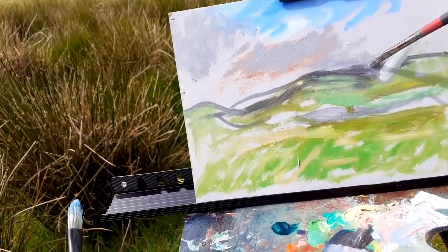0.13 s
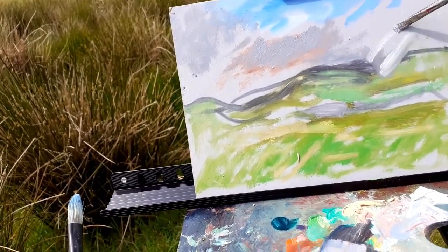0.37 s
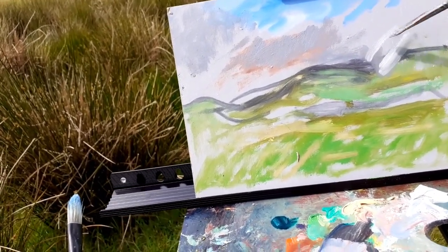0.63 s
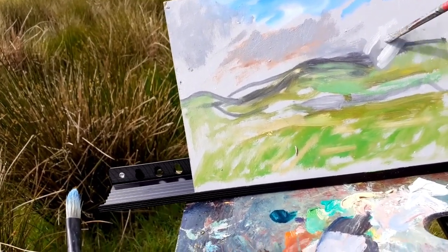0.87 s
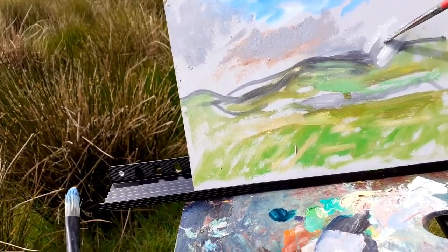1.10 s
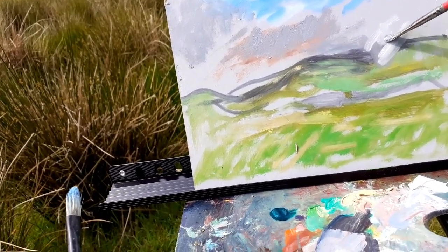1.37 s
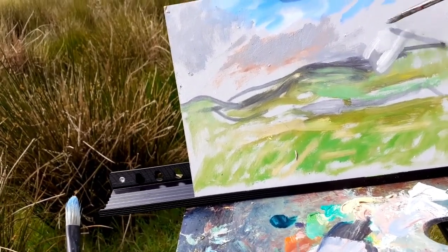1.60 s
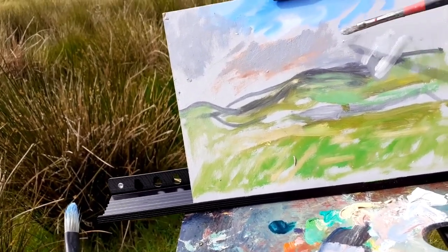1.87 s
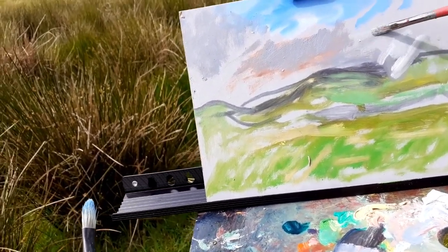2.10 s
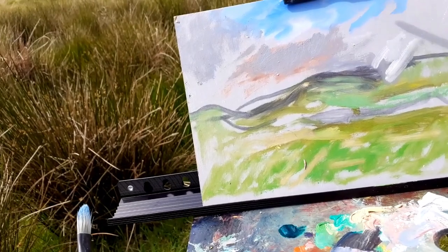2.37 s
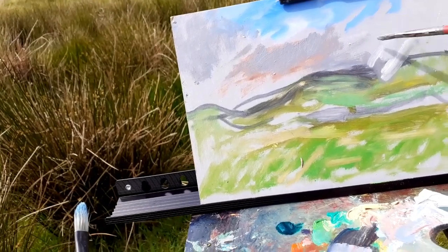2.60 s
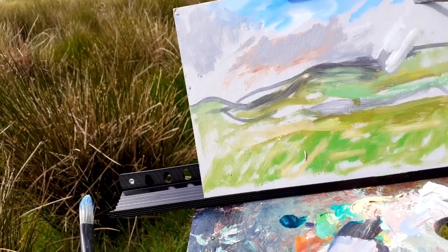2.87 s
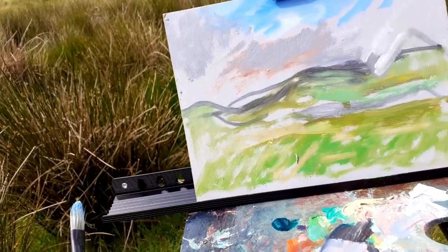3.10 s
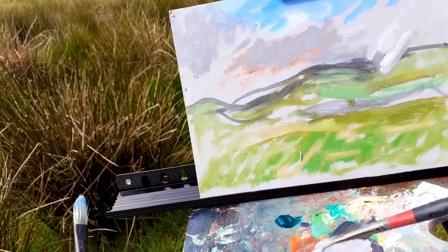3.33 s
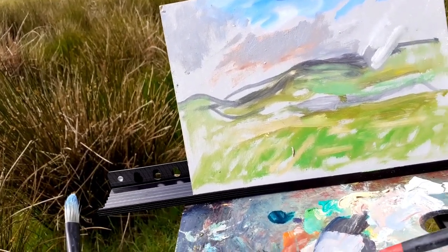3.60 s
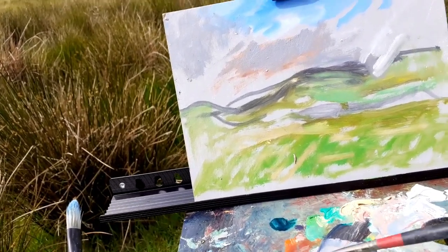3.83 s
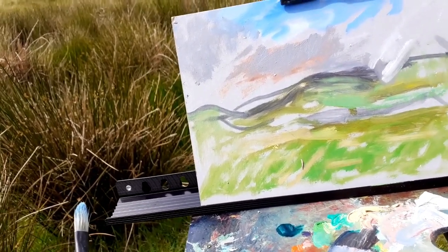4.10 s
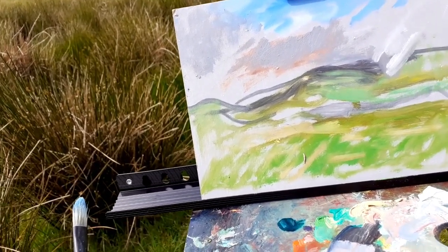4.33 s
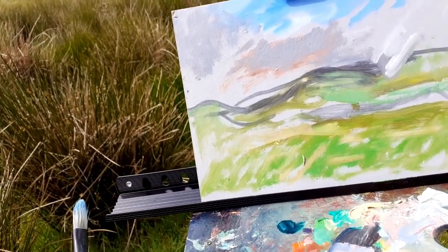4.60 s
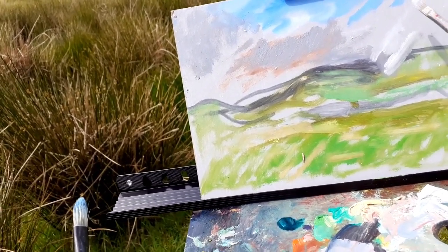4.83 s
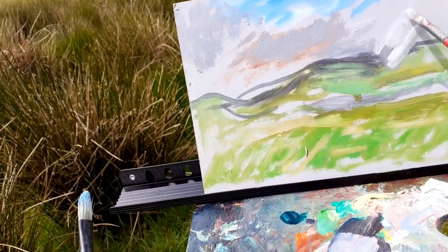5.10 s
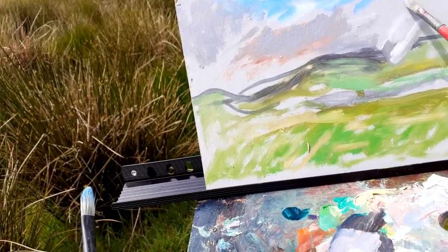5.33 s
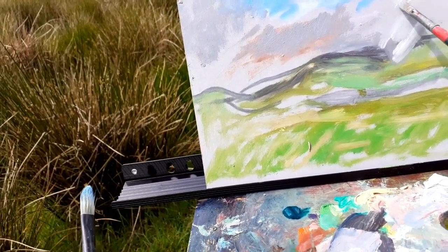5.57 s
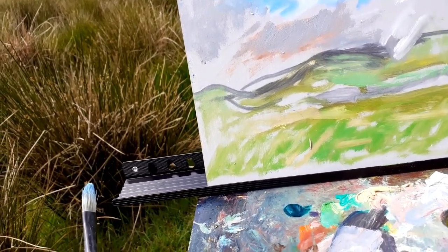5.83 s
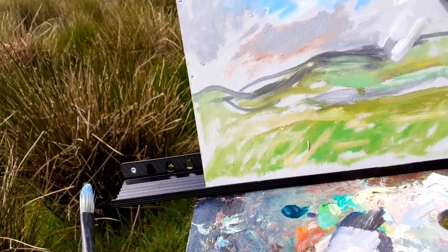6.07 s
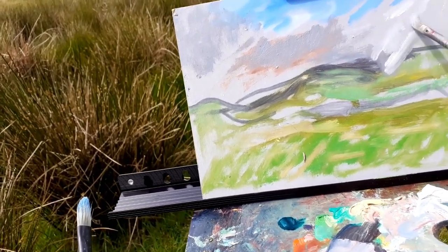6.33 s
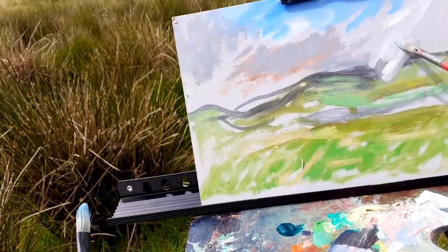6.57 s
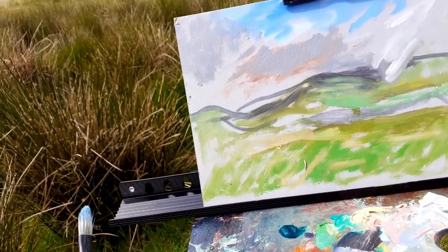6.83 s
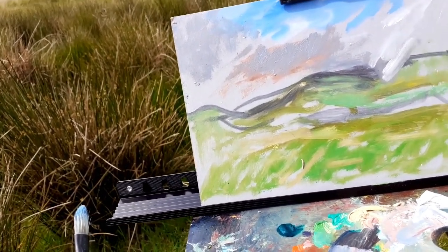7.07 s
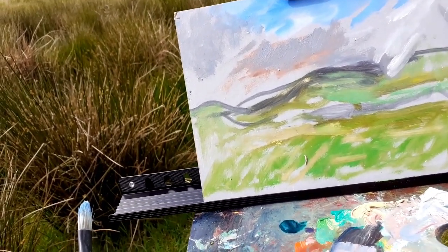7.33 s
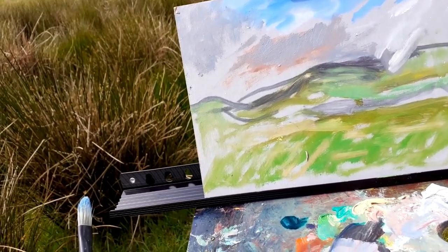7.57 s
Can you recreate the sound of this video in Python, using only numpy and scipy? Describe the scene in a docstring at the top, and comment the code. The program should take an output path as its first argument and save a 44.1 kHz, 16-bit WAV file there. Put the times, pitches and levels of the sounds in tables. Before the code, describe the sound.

Strong low wind thumps fade to near quiet while bristles scrape a panel in brief bursts, ending in a brisk run of louder strokes.

```python
"""Brush scrubbing a panel outdoors

A stiff paintbrush scrubs a primed panel in short strokes, close to two microphones on open moorland:
dense bristle clicks hiss, scrape and ring the panel's modes; the ferrule knocks as short blows.
Wind noise, unlike on the two sides, buffets hard at first and dies down, stirring on the right at the end.
Shaped noise makes grass and sleeve rustle, resonated noise a fading far engine, gliding sines a bird."""
import sys
import numpy as np
from scipy import signal
from scipy.fft import rfft, irfft, next_fast_len
from scipy.io import wavfile
from scipy.ndimage import uniform_filter1d

SR = 44100
rng = np.random.default_rng(int(sys.argv[2]) if len(sys.argv) > 2 else 0)


def invert_db(level):
    """Linear amplitude ratio for a level in decibels (20 dB per decade), elementwise."""
    return 10 ** (np.asarray(level, dtype=float) / 20)


def wrap_up_sound(samples):
    """Save the sound to the file named by the first command line argument, as 16-bit audio."""
    columns = np.atleast_2d(samples).T
    # keep every value between -1 and 1, then stretch to whole-number steps
    tamed = np.clip(columns, -1, 1)
    steps = np.round(tamed * 32767).astype(np.int16)
    wavfile.write(sys.argv[1], SR, steps)


N = 339129

# panel modes: (frequency [Hz], width [Hz], level brushed mid panel [dB], level in the far corner [dB])
PANEL = [(149, 14, -4, -6), (254, 88, -3, 2.5), (353, 33, 7.5, 1.5), (480, 170, 0.5, -11.5),
         (734, 21, -5, -4)]


def evened(x):
    """Scales each channel to rms 1."""
    return x / np.sqrt(np.mean(x ** 2, -1, keepdims=True) + 1e-20)


def spectrum_db(points, hz):
    """Interpolates (frequency [Hz], level [dB]) over log frequency; -90 dB outside."""
    f, db = np.transpose(points)
    return np.interp(np.log(hz + 1), np.log(f + 1), db, left=-90, right=-90)


def add(mix, start_s, sound):
    """Adds a sound into the mix in place, cut at the end."""
    part = mix[max(round(start_s * SR), 0):][:len(sound)]
    part += sound[:len(part)]


def coloured(x, points):
    """Shapes x by a spectrum, to rms 1."""
    size = next_fast_len(N)
    gain = invert_db(spectrum_db(points, np.fft.rfftfreq(size, 1 / SR)))
    return evened(irfft(rfft(x, size) * gain, size)[..., :N])


def resonate(x, hz, width_hz):
    """Two-pole resonance with zeros at 0 Hz and half the sample rate."""
    r = np.exp(-np.pi * width_hz / SR)
    return signal.lfilter([1 - r, 0, r - 1], [1, -2 * r * np.cos(2 * np.pi * hz / SR), r * r], x)


def wander(seconds, channels=2):
    """Smoothed noise of rms 1 that holds for about the given time."""
    size = max(round(seconds * SR), 1)
    noise = rng.standard_normal((channels, N))
    return evened(uniform_filter1d(uniform_filter1d(noise, size), size))


def patchy(x, depth_db):
    """Colour that drifts in patches some hundred Hz wide and some 90 ms long, alike on both sides."""
    z = signal.stft(x, nperseg=512)[2]
    field = rng.standard_normal(z.shape[1:])
    field = uniform_filter1d(uniform_filter1d(field, size=4, axis=0), size=16, axis=1)
    z = z * invert_db(depth_db * field / field.std())
    return evened(signal.istft(z, nperseg=512)[1][:, :N])


def heard(source, other, lag_s, alike, right_db):
    """A source reaches the left microphone later; reflections add an unlike part there."""
    alike = np.clip(alike, 0, 1)
    left = alike * np.roll(source, round(lag_s * SR)) + np.sqrt(1 - alike ** 2) * other
    return np.array([left, source]) * invert_db([[-right_db], [right_db]])


def shaded(pair, column):
    """The recorder's body shades each side; half the lean goes to each. Column 1 mid panel, 2 corner."""
    # (frequency [Hz], left over right from mid panel [dB], from the far corner [dB])
    shading = [(1300, -2, 0), (2960, -2.5, -2), (5630, -6, -3), (8200, -12, -6.5), (9600, -11, 9.5),
               (11200, 9, 0.5), (11500, -10.5, 4.5), (14900, -4.5, 2.5)]
    size, table = next_fast_len(N), np.transpose(shading)
    log_hz = np.log(np.fft.rfftfreq(size, 1 / SR) + 1)
    half_lean_db = np.interp(log_hz, np.log(table[0]), table[column]) / 2
    return irfft(rfft(pair, size) * invert_db([half_lean_db, -half_lean_db]), size)[:, :N]


def air():
    """Still background: steady noise of far wash and microphone hiss."""
    # spectrum: (frequency [Hz], relative density [dB])
    spectrum = [(35, -54.5), (60, -18), (313, 2.5), (470, -11.5), (750, -7), (1050, -17.5), (1360, -17),
                (6000, -35), (8800, -24.5), (16000, -27)]
    noise = coloured(rng.standard_normal((2, N)), spectrum)
    return invert_db(-72.5) * heard(*noise, lag_s=0.0005, alike=0.39, right_db=1.73)


def drone():
    """Far engine: noise rung at low orders, narrow and wavering, nearly alike on both sides."""
    # (time [s], third order level [dB], second and fourth order level [dB])
    levels = [(1.5, -68.5, -64), (4.5, -64, -91), (4.7, -73, -77), (5.6, -73, -72.5), (6.9, -83, -72)]
    base_hz, width_hz = 40.8, 26
    s, third_db, others_db = np.transpose(levels)
    third, others = (invert_db(np.interp(np.arange(N) / SR, s, db)) for db in (third_db, others_db))
    noise = rng.standard_normal((2, N))
    second_order, third_order, fourth_order = (
        evened(resonate(resonate(noise, k * base_hz, width_hz), k * base_hz, width_hz)) for k in (2, 3, 4))
    orders = third * third_order + others * (second_order + 0.6 * fourth_order)
    waver = invert_db(4 * wander(0.12, channels=1))
    return heard(*waver * orders, lag_s=0.0002, alike=0.9, right_db=1.5)


def bird():
    """Far bird: thin gliding sines, shaky in pitch, their level blurred by distance."""
    # (start [s], length [s], first pitch [Hz], last pitch [Hz], level [dB])
    chirps = [(1.09, .07, 8150, 8300, -84), (3.485, .085, 8350, 8150, -76), (4.54, .06, 2950, 2700, -86)]
    out = np.zeros(N)
    shake_hz = 110 * wander(0.004, channels=1)[0]
    for s, length_s, first_hz, last_hz, db in chirps:
        hz = np.linspace(first_hz, last_hz, round(length_s * SR))
        hz = hz + shake_hz[round(s * SR):][:len(hz)]
        whistle = np.sin(2 * np.pi * np.cumsum(hz) / SR)
        add(out, s, invert_db(db) * np.hanning(len(hz)) ** 0.1 * whistle)
    return out * invert_db(7.9 * wander(0.004))


def rustle():
    """Grass and cloth: dull noise swells as the sleeve moves, thin treble over a steady grass floor."""
    # (peak [s], rise [s], fall [s], level [dB], treble over it [dB])
    swells = [(0.2, 0.055, 0.36, -73.5, -4), (1.23, 0.045, 0.029, -69.5, -6), (1.45, 0.48, 0.73, -75.5, -7),
              (2.42, 0.17, 0.13, -81, 3.5), (2.65, 0.34, 0.085, -77, -4.5), (3.23, 0.2, 0.13, -70.5, -3),
              (3.5, 0.23, 0.092, -81.5, 2), (3.59, 0.07, 0.14, -73.5, 6), (4.1, 0.27, 0.069, -74, 0),
              (4.4, 0.3, 0.38, -76, -2.5), (4.96, .1, 0.11, -77, -2.5), (5.249, 0.16, 0.23, -70, -1),
              (6.5, 0.56, 0.33, -69, -11)]
    # dull spectrum: (frequency [Hz], relative density [dB])
    low_spectrum = [(180, 8), (330, 1.5), (750, 4), (1450, 0.5), (1900, -6.5), (2500, -14), (5000, -23)]
    # treble spectrum: (frequency [Hz], relative density [dB])
    high_spectrum = [(1500, -6), (2500, -0.5), (5000, -2), (7200, -2.5), (8800, -2.5), (10700, -5),
                     (16000, -2.5)]
    grass_db = -86
    t = np.arange(N) / SR
    power = np.zeros((2, N))
    for s, rise_s, fall_s, db, treble_db in swells:
        bump = np.exp(-(2 * (t - s) / np.where(t < s, rise_s, fall_s)) ** 2)
        power += invert_db([[2 * db], [2 * (db + treble_db)]]) * bump
    swell, hiss = np.sqrt(power)
    low_waver, high_waver = (invert_db(0.77 * wander(0.023, channels=1)) for layer in range(2))
    low = coloured(patchy(rng.standard_normal((2, N)), depth_db=1.5), low_spectrum)
    low = heard(*low, lag_s=0.00037, alike=0.41, right_db=5.5)
    high = coloured(patchy(rng.standard_normal((2, N)), depth_db=1.0), high_spectrum)
    high = shaded(heard(*high, lag_s=0.00037, alike=0.2, right_db=0.5), column=1)
    return swell * low_waver * low + np.hypot(hiss, invert_db(grass_db)) * high_waver * high


def wind():
    """Lumpy pressure noise, unrelated on the two sides; harder gusts carry smaller, higher eddies."""
    # steady buffeting: (time [s], left level [dB], right level [dB])
    gusts = [(0.031, -37, -68.5), (0.221, -28, -56), (0.42, -35.5, -45.5), (0.68, -42.5, -51.5),
             (0.87, -34, -79), (0.92, -49, -46.5), (1.125, -45, -49.5), (1.166, -37.5, -56),
             (1.6, -47.5, -46), (2.1, -53, -62.5), (3.1, -64.5, -69), (3.7, -55.5, -65), (4.1, -59.5, -68),
             (4.499, -75.5, -63), (4.7, -77, -80), (5.5, -82, -63.5), (6.7, -88, -71.5), (6.899, -107, -93),
             (7.599, -91, -49), (7.66, -84, -72)]
    # single eddies bursting on one microphone: (middle [s], level [dB], frequency [Hz], side)
    thumps = [(0.012, -11, 257, "left"), (0.021, -15.5, 200, "left"), (0.058, -17.5, 125, "left"),
              (0.153, -13.5, 100.5, "left"), (0.19, -8, 243, "left"), (0.216, -16, 102, "left"),
              (0.243, -15.5, 262, "left"), (0.328, -19.5, 154, "left"), (0.394, -23, 111, "left"),
              (0.457, -34, 99, "right"), (0.495, -30, 120, "left"), (0.664, -28.5, 150, "left"),
              (0.737, -25, 122, "left"), (0.806, -19, 151, "left"), (0.864, -18, 215, "left"),
              (1.154, -22, 150, "left"), (1.247, -29, 97, "right"), (1.263, -27, 112, "left"),
              (1.298, -25, 92, "right"), (1.316, -32.5, 111, "left"), (1.398, -23, 98, "left"),
              (1.593, -23, 99, "left"), (1.187, -22.5, 85, "left"), (1.681, -30.5, 100, "left"),
              (1.944, -31, 98, "left"), (1.524, -29, 95.5, "left"), (3.637, -37.5, 146, "left"),
              (3.944, -36, 87, "left"), (7.532, -39.5, 97, "right"), (7.612, -41.5, 105, "right")]
    # light breeze spectrum: (frequency [Hz], relative density [dB])
    buffet = [(15, -49.5), (30, -10), (58, -1.5), (100, -0.5), (170, -19.5), (400, -47.5)]
    # small eddies' spectrum: (frequency [Hz], relative density [dB])
    eddies = [(60, -12), (115, 5), (280, -1.5), (420, -14.5), (750, -43), (1400, -50.5), (2000, -79.5)]
    lumpy_db = 9.5
    s, *levels = np.transpose(gusts)
    level_db = np.array([np.interp(np.arange(N) / SR, s, db) for db in levels])
    lumps = np.tanh(wander(0.013))  # drives large and small eddies alike
    body = coloured(rng.standard_normal((2, N)), buffet) * invert_db(lumpy_db * lumps)
    small = coloured(rng.standard_normal((2, N)), eddies)
    small_db = 0.45 * (level_db + 27.5) + 6 * lumps + 6 * np.tanh(wander(0.008)) - 3
    out = invert_db(level_db) * (body + small * invert_db(small_db))
    t = np.arange(-0.02, 0.03, 1 / SR)
    for (s, db, hz, side), phase in zip(thumps, rng.random(len(thumps))):
        eddy = np.exp(-(t * hz / 0.41) ** 2) * np.cos(2 * np.pi * (hz * t + phase))
        # steep front, stronger in small eddies
        snap = np.exp(-(t * hz / 0.28) ** 2) * np.sin(2 * np.pi * 1.52 * hz * t)
        rough = small[0, max(round((s - 0.02) * SR), 0):][:len(t)]
        wake = np.exp(-(t / np.where(t < 0, 0.006, 0.012)) ** 2) * rough
        burst = eddy + (hz / 400) ** 2 * snap + 0.13 * wake
        add(out[int(side == "right")], s - 0.02, invert_db(db) * burst)
    return out


def knocks():
    """The ferrule touches and bounces: short blows tick and ring the top panel mode."""
    # (time [s], blow [dB])
    blows = [(2.694, -35.5), (2.715, -43), (2.728, -46.5), (6.137, -23)]
    held_width_hz = 200  # damped while the ferrule rests on the panel
    blow = np.zeros(N)
    for s, db in blows:
        add(blow, s, invert_db(db) * np.hanning(16))
    ring = resonate(blow, PANEL[-1][0], held_width_hz)
    tick = 0.18 * np.gradient(blow)
    return (ring + tick) * invert_db([[-2.5], [2.5]])


def brush():
    """Bristles slip in dense tiny clicks; the clicks hiss, scrape and ring the panel."""
    # (nominal middle [s], nominal length [s], bristle fizz [dB], panel ring over the fizz [dB])
    strokes = [(0.186, 0.063, -70.5, 10.5), (0.365, 0.11, -56.5, -5), (0.455, 0.088, -73.5, 3),
               (0.895, 0.059, -68.5, -3), (0.97, 0.061, -72.5, 1), (1.063, 0.068, -65, -6.5),
               (1.321, 0.065, -66, 1), (1.399, 0.043, -61, -1.5), (1.472, 0.058, -57, -0.5),
               (1.56, 0.047, -60, 0.5), (1.59, 0.1, -67.5, -4), (2.082, 0.1, -58, 0.5),
               (2.822, 0.071, -68, 6), (2.892, 0.12, -50, -7), (3.024, 0.069, -61.5, 1.5),
               (3.658, 0.057, -64.5, -18), (3.747, 0.088, -71.5, -7), (3.833, 0.052, -67.5, -11),
               (4.393, 0.051, -72, -22), (4.553, 0.044, -74.5, -14), (5.395, 0.064, -59, -10),
               (5.456, 0.047, -75.5, 16), (5.497, 0.077, -59, -2.5), (5.597, 0.063, -60, -1.5),
               (5.675, 0.053, -68.5, 1.5), (5.752, 0.033, -71, 4), (5.843, 0.087, -56, -5),
               (6.011, 0.092, -69.5, -24), (6.144, 0.098, -50.5, 2.5), (6.29, 0.057, -53.5, -20),
               (6.388, 0.063, -48, -5), (6.484, 0.041, -52, -7), (6.564, 0.038, -50.5, -0.5),
               (6.644, 0.046, -50, -4.5), (6.726, 0.038, -50.5, -3), (6.773, 0.067, -67.5, 5.5),
               (7.386, 0.11, -77.5, -16)]
    # bristle tips' spectrum: (frequency [Hz], relative density [dB])
    fizz_spectrum = [(1760, -10), (3000, -5), (3700, -2), (4550, -3.5), (5300, 0.5), (6500, -1.5),
                     (7900, -0.8), (10600, 2.5), (13300, 1.9), (16000, -3.5)]
    # scrape spectrum: (frequency [Hz], relative density [dB])
    scrape_spectrum = [(700, 16.5), (1050, -3.5), (1300, 13.5), (1830, 0.5), (2100, -10), (2500, 8.5),
                       (3500, -4.5), (4500, -15)]
    # scrape over fizz for a -56 dB stroke of 0.16 s; harder and longer strokes scrape more
    scrape_base_db, scrape_db_per_fizz_db, scrape_db_per_doubled_length = -17.5, 1.23, 2
    later_per_s = 0.51  # long strokes build up slowly and stop short
    corner_from_s = 4.8  # the brush moves on to the far corner

    pressure = np.zeros((3, N))  # fizz, scrape, ring
    for mid_s, length_s, fizz_db, ring_db in strokes:
        scrape_db = scrape_base_db + scrape_db_per_fizz_db * (fizz_db + 56)
        scrape_db += scrape_db_per_doubled_length * np.log2(length_s / 0.16)
        u = np.linspace(0, 1, round(1.84 * length_s * SR))
        # the load grows along the stroke, so the lower layers peak late
        for row, (db, late) in enumerate([(0, 1.25), (scrape_db, 1.5), (ring_db, 1.7)]):
            warped = u ** (late + later_per_s * (length_s - 0.06))
            shape = np.tanh(1.97 * np.sin(np.pi * warped) ** 3.32)
            add(pressure[row], mid_s - 0.97 * length_s, invert_db(fizz_db + db) * shape)

    click_db = 2.2 * np.minimum(rng.exponential(1, (2, N)), 6) + 1.2 * wander(0.002)
    slips = rng.standard_normal((2, N)) * invert_db(click_db)
    # each spot of paint and each angle of the brush sounds a little different
    slips = patchy(slips, depth_db=2.2)

    corner = np.arange(N) / SR > corner_from_s
    steady = sum(invert_db(db) / np.sqrt(w) * resonate(slips, hz, w) for hz, w, db, _ in PANEL)
    # the panel keeps ringing a little after the bristles leave
    ring = sum(invert_db(np.where(corner, far_db, db)) / np.sqrt(w) * resonate(pressure[2] * slips, hz, w)
               for hz, w, db, far_db in PANEL) / steady.std()
    ring = heard(*ring, lag_s=0.00005, alike=0.9, right_db=3.5)
    fizz = heard(*pressure[0] * coloured(slips, fizz_spectrum), lag_s=0.00014, alike=0.5, right_db=0)
    scrape = heard(*pressure[1] * coloured(slips, scrape_spectrum),
                   lag_s=0.00056, alike=0.23, right_db=5.0)
    bristles = fizz + scrape
    return np.where(corner, shaded(bristles, column=2), shaded(bristles, column=1)) + ring


def scene():
    """All sources at the two microphones."""
    return air() + drone() + bird() + rustle() + wind() + knocks() + brush()


def roll_off(x):
    """The treble ends steeply here."""
    return signal.sosfilt(signal.butter(12, 15790, fs=SR, output="sos"), x)


def record(dry):
    """The microphones' low cut, then a sharp upper cutoff."""
    low_cut_hz, cutoff_hz = 50.3, 15790
    cut = signal.sosfilt(signal.butter(3, low_cut_hz, "high", fs=SR, output="sos"), dry)
    size = next_fast_len(N)
    passband = np.fft.rfftfreq(size, 1 / SR) < cutoff_hz
    limited = irfft(rfft(cut, size) * passband, size)[:, :N]
    return roll_off(limited)


dry = scene()
out = record(dry)
wrap_up_sound(out)
```